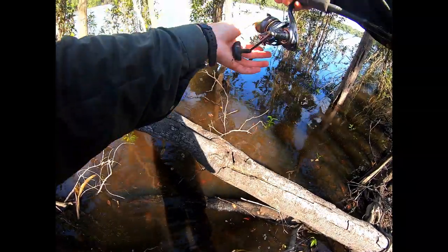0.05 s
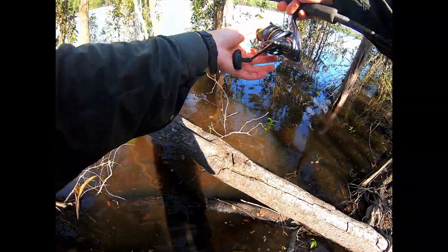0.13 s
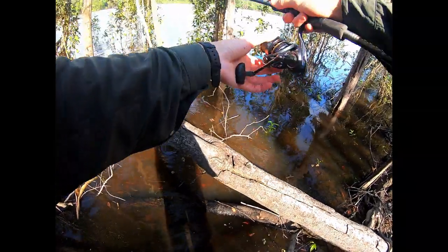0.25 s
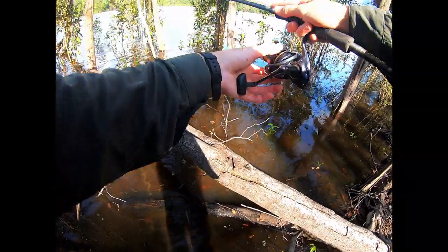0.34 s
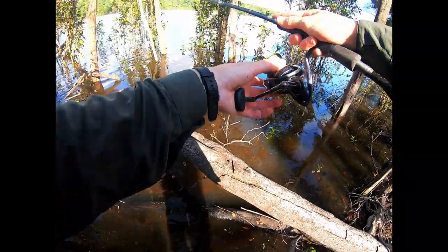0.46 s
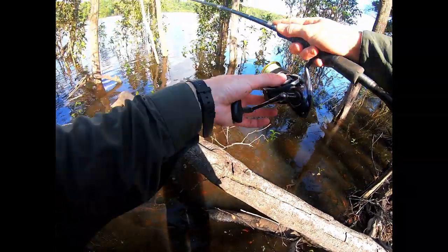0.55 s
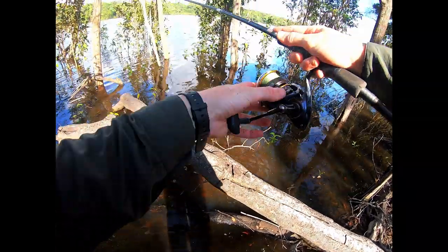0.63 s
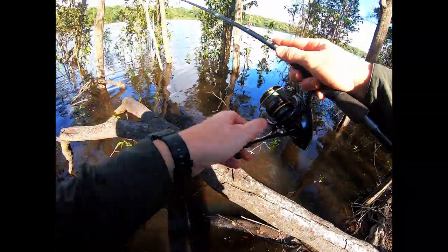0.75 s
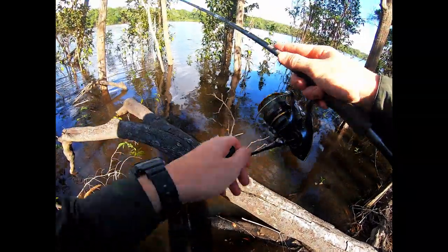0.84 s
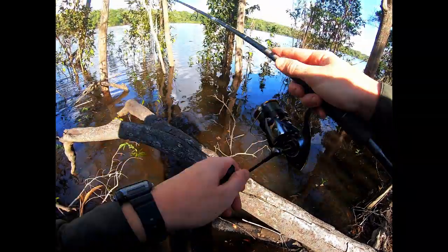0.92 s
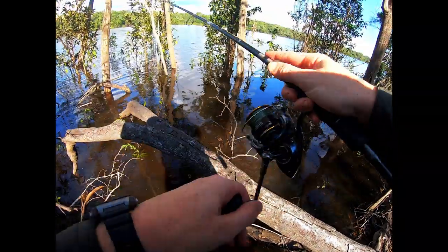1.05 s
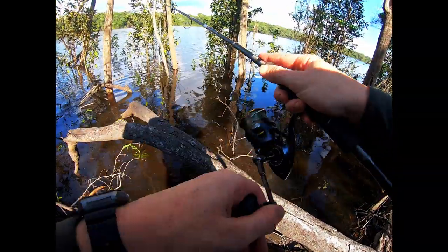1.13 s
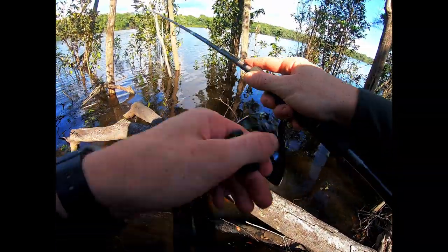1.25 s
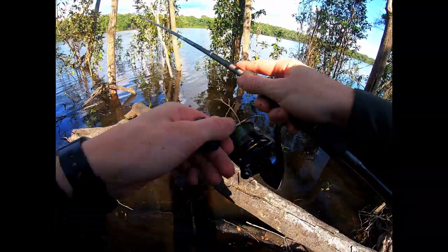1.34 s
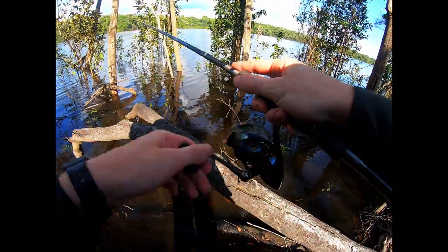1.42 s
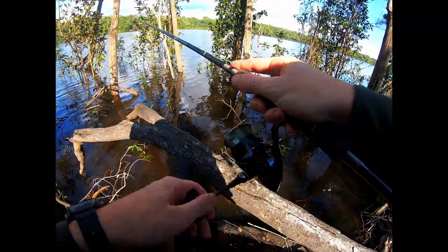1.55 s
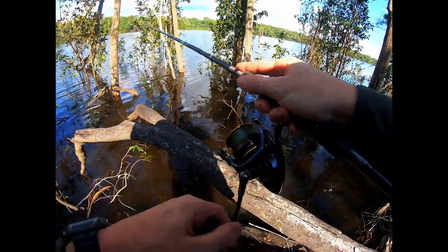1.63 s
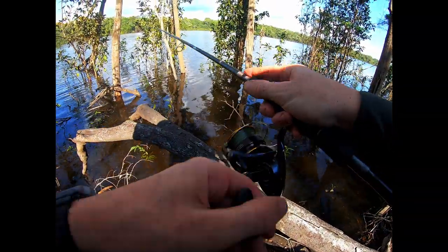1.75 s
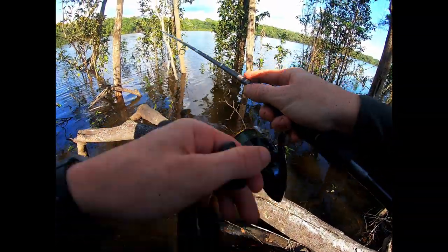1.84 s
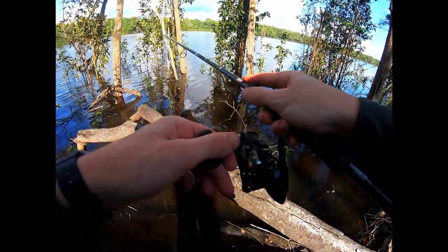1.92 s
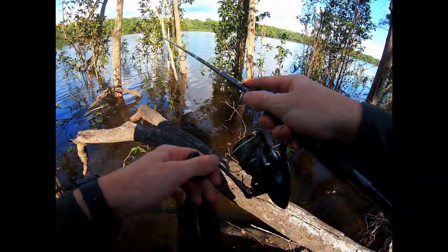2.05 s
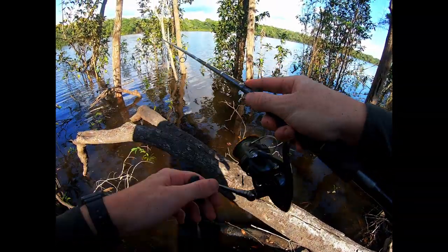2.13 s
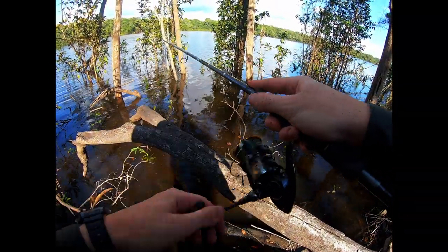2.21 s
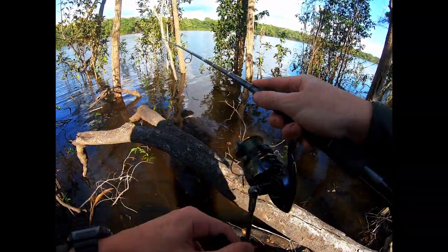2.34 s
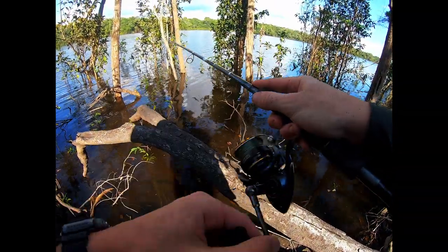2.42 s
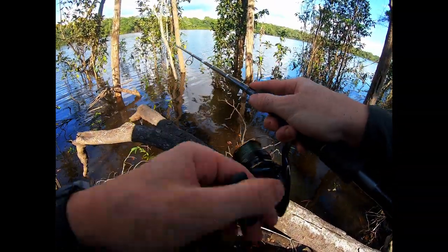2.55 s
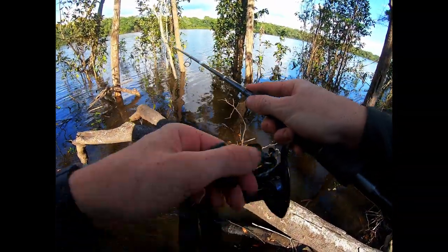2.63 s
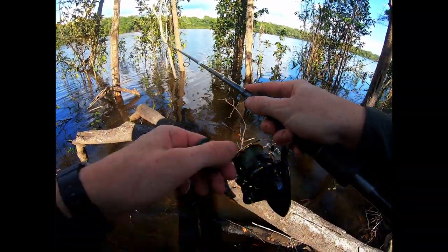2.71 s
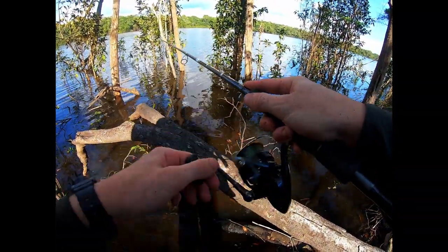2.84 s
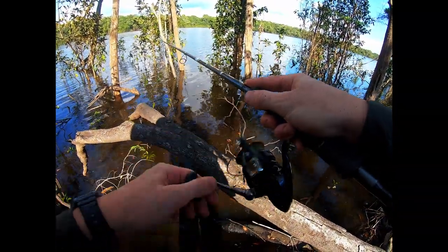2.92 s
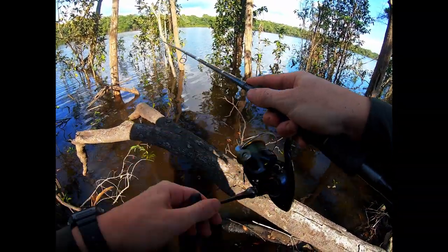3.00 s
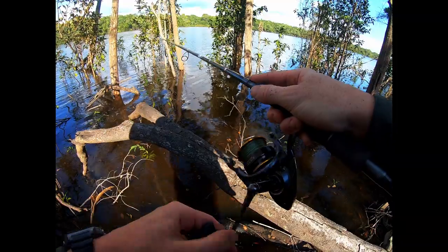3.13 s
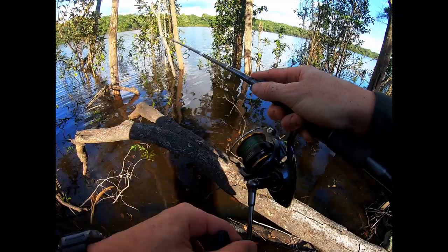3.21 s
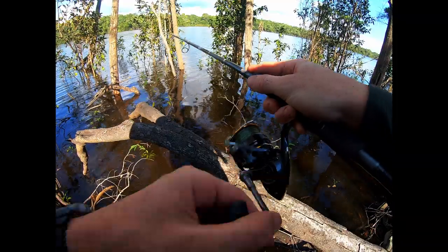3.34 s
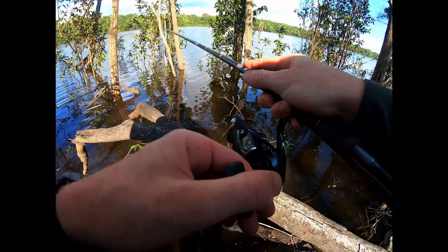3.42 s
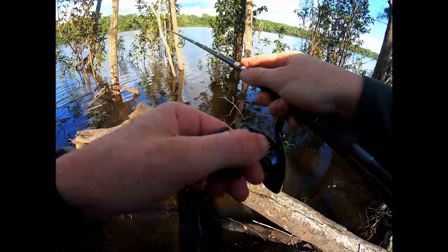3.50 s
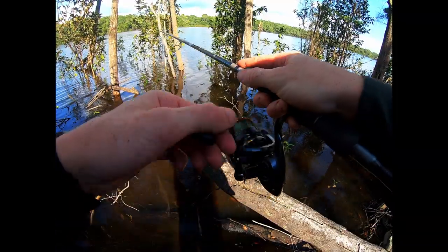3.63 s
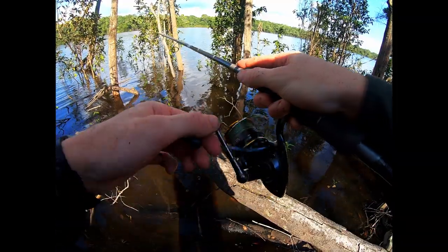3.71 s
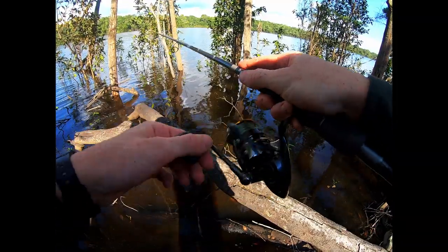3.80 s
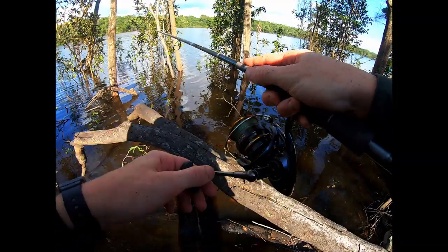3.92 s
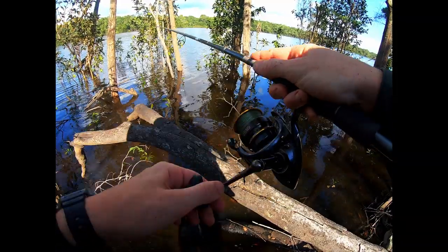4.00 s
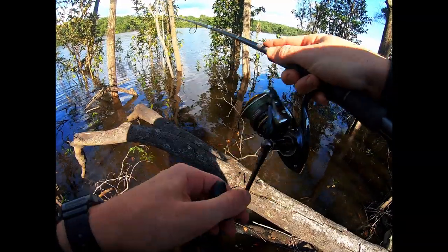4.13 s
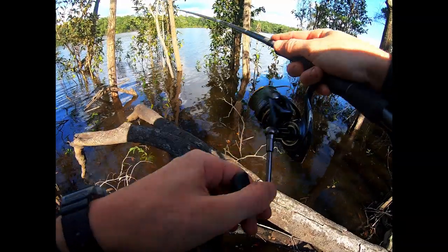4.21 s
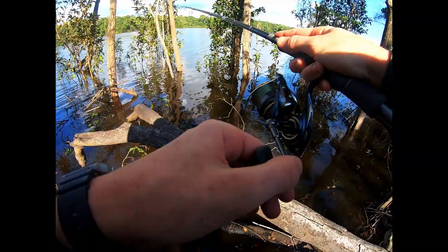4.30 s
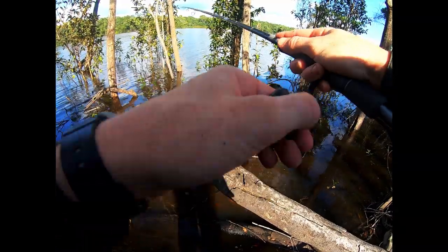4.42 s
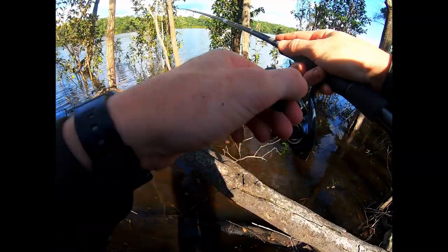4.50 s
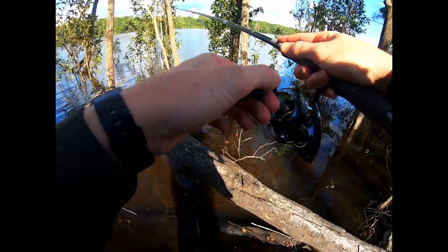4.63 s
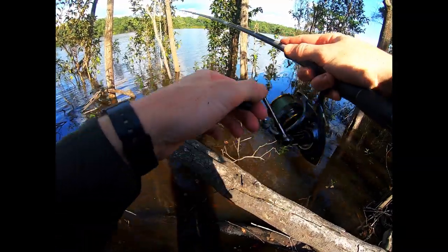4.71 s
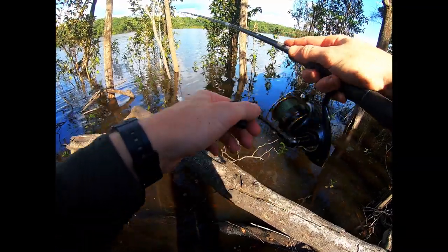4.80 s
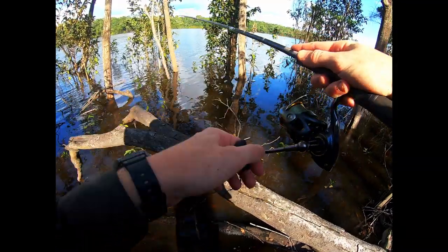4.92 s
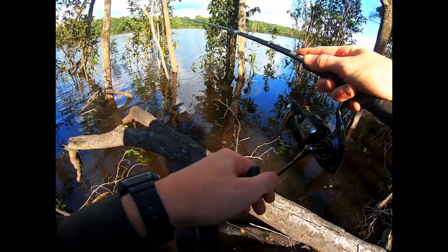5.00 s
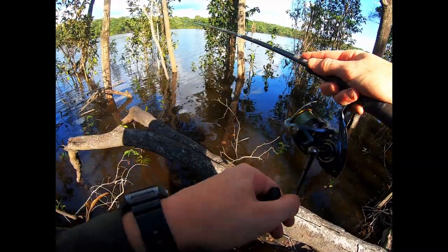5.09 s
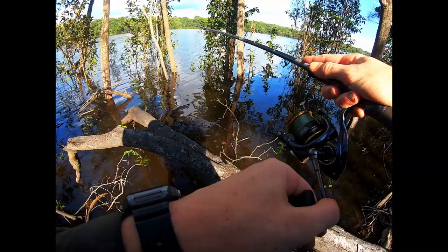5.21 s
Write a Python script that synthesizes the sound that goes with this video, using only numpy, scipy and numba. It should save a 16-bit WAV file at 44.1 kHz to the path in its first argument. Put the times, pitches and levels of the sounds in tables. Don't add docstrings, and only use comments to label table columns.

```python
import sys
import numpy as np
from scipy import signal
from scipy.fft import rfft, irfft
from scipy.io import wavfile
from scipy.ndimage import uniform_filter1d
from numba import njit

SR = 44100
rng = np.random.default_rng(int(sys.argv[2]) if len(sys.argv) > 2 else 0)


def store_pcm(level_fs):
    pcm = np.round(np.clip(level_fs, -1, 1) * 32767).astype(np.int16)
    wavfile.write(sys.argv[1], SR, np.atleast_2d(pcm).T)


def gain_from_decibels(decibels):
    exponent = np.asarray(decibels, float) / 20
    return 10 ** exponent


N = 231657
T = np.arange(N) / SR
F = np.maximum(np.fft.rfftfreq(N, 1 / SR), 1)

# f/Hz, density/dB
FOREST = [(47, -47), (80, -48), (159, -9), (413, -1), (785, 0.5), (958, -3), (1340, 0), (1670, -14),
          (3320, -23), (6500, -4.5), (7400, -6), (8200, -6), (11700, -45), (13100, -32), (16000, -53)]
# t/s, half length/s, level/dB
BREEZE = [
    (.02, 0.055, 0),
    (.36, 0.065, -9),
    (1.3, 0.072, -19),
    (2.35, 0.12, -35),
]
# t/s, half length/s, level/dB
SWELLS = [
    (.03, 0.04, -59.5),
    (.6, 0.19, -67.5),
    (1.5, 0.18, -75),
    (2.55, 0.068, -73),
    (4.16, 0.049, -66),
    (4.75, 0.58, -83),
]
# t/s, half length/s, level/dB
PUFFS = [
    (.48, 0.024, -63),
    (.7, 0.027, -59),
    (.95, 0.081, -67),
    (1.45, 0.041, -99),
    (1.81, 0.027, -74),
    (2.05, 0.092, -80),
    (2.71, 0.028, -72),
    (4.01, 0.023, -79),
]
# f/Hz, width/Hz, level/dB
INSECTS = [(6876, 210, -64.5), (7900, 110, -68), (8350, 200, -70), (8475, 490, -61)]
# t/s, half length/s, level/dB
RUSTLE = [
    (.3, 0.11, -67),
    (.75, 0.17, -53.5),
    (1.64, 0.17, -61),
    (2.08, 0.1, -58.5),
    (2.55, 0.15, -61),
    (3.17, 0.17, -70),
    (3.87, .03, -71),
    (4.35, 0.22, -69.5),
    (4.7, 0.2, -70),
    (5.15, 0.38, -69),
]
# t/s, half length/s, gain/dB
AIRY = [
    (1.15, 0.073, 3),
    (1.6, 0.32, -8),
    (2.3, 0.11, -11),
    (2.55, .1, -8),
    (3.02, 0.037, -1),
    (3.22, 0.1, 0),
    (3.5, .03, -1),
    (3.87, 0.016, -3),
    (4.35, .1, -23),
    (5.1, 0.14, -7),
]
# f/Hz, density/dB
CLOTH = [(1500, 4), (3500, -6), (5000, -.5), (6700, -1.5), (7400, -5.5), (8500, 1), (10500, -43), (11500, -45)]
CLOTH_TOP = [(8500, -10), (9600, 1), (10500, 0), (11500, -11), (13500, -8), (15800, -22)]
SWISH = [(3300, -16), (4500, -3), (6000, -5.5), (8500, 1.5), (10500, -6), (11500, -21), (15500, -25)]
# t/s, peak/dB, f/Hz, width/Hz, t60/s
TOUCHES = [(0.189, -43, 9500, 3000, .04), (.197, -40, 2900, 2500, 0.034), (.25, -54, 10400, 4000, .04),
           (0.408, -43, 7750, 4000, 0.031), (.532, -37, 8260, 4000, 0.03), (.554, -36, 7300, 4960, 0.047),
           (0.555, -37.5, 3500, 1200, 0.098), (0.558, -27.5, 4970, 2530, 0.058),
           (0.562, -37.5, 3400, 900, 0.1), (.58, -45, 5040, 7000, .15), (0.6057, -26, 2780, 3500, 0.031),
           (0.621, -38, 2310, 900, 0.11), (0.564, -34, 7400, 3500, .04), (.59, -42, 3270, 1500, 0.055),
           (.827, -45, 1500, 2500, .02), (.6298, -29.5, 3140, 1500, 0.025), (.634, -45, 3780, 1200, 0.042),
           (.648, -43, 3050, 890, 0.2), (.8396, -38, 8300, 6000, 0.033), (.819, -41, 2900, 500, .04),
           (.56, -35.5, 2400, 600, 0.096), (.585, -35.5, 1300, 1500, 0.087),
           (0.875, -35, 3700, 4000, 0.018), (2.09, -47, 6000, 7000, 0.15), (0.631, -36.5, 800, 700, 0.15),
           (0.731, -32, 520, 400, 0.18), (.745, -37, 1000, 700, 0.24), (.703, -22, 1500, 600, .07),
           (.728, -26, 4500, 900, .07), (2.178, -38, 750, 600, 0.17), (2.48, -39, 1230, 900, 0.3)]
# t/s, peak/dB, low f/Hz, high f/Hz, t60/s
KNOCKS = [(.563, -39.5, 767, 890, 0.071), (.598, -27.5, 870, 1020, 0.024), (.607, -26, 366, 821, 0.11),
          (.612, -29.5, 328, 420, 0.09), (.6195, -28.5, 634, 956, 0.036), (.639, -37, 497, 980, 0.1),
          (.630, -21, 676, 1030, 0.0083), (2.18, -43, 470, 923, 0.059), (2.189, -37, 369, 477, 0.1),
          (2.197, -37, 620, 1100, .03), (2.4713, -25, 1250, 1530, 0.02), (2.475, -24, 1430, 1670, 0.048),
          (2.492, -40, 990, 1160, 0.076)]
# t/s, peak/dB, bright share/dB, push/ms, ring length/1
BAIL = [(0.6922, -17, -14, 0.43, 0.6), (0.7016, -2.5, -0.5, 0.69, 0.59), (0.7099, -20, -1, 0.27, 0.17),
        (0.7142, -16.5, 1, .25, 0.24), (0.727, -8, -1, 0.56, 0.43), (0.7342, -18, -3, .25, 0.27),
        (0.746, -25, -16.5, .5, 1), (0.758, -37, -8, .4, 0.3), (.769, -32, -17, .4, 0.3),
        (0.7762, -30, -29, 0.37, 0.25), (0.819, -47, -25, .5, 0.5)]
# f/Hz, level/dB, t60/s
BAIL_BODY_MODES = [(1057, -16.5, 0.069), (1903, -6.5, 0.058), (2100, -3.5, 0.061), (2190, -26, 0.044),
                   (2400, -33, 0.045), (2900, 3, 0.022), (3100, -12.5, 0.019), (3560, 1, 0.021),
                   (4066, -7, 0.041), (3630, -13, 0.049), (4630, -1, 0.014)]
WIRE_MODES = [(5170, -12.5, 0.069), (6200, -23, .05), (5610, -1, 0.038), (6040, -5, 0.057),
              (7000, -11, 0.046), (8060, 1, 0.016), (8885, -7.5, 0.04), (9500, -23, 0.034),
              (11180, -25, 0.016), (12700, -26, 0.0142), (14200, -25, .015)]
# f/Hz, density/dB
CRACK = [(88, -58), (150, -15), (790, -19), (1040, -22.5), (1660, -10.5), (2140, 2), (2400, -11),
         (3620, -3), (4860, -18), (5460, -7.5), (10400, -14), (11700, -35), (16000, -35)]
# t/s, effort/dB, line resonance f/Hz, line tension/dB
CRANK = [(.95, -64, 2210, -66), (1.15, -53.5, 2000, -66), (1.33, -52, 1850, -69), (1.84, -51, 1880, -62.5),
         (2.2, -51.5, 2260, -74), (2.44, -52, 1730, -63), (2.62, -52, 1740, -64.5),
         (2.89, -53.5, 1790, -65.5), (3.26, -53, 1684, -62.5), (3.5, -55.5, 1810, -66),
         (3.62, -55.5, 1970, -67), (3.82, -55.5, 2050, -66), (4.0, -57, 2100, -72), (4.17, -56, 2230, -66),
         (4.35, -55.5, 2090, -64), (4.59, -57, 1980, -61), (4.84, -58, 1910, -60.5),
         (5.25, -54, 1880, -61.5)]
# f/Hz, width/Hz, level/dB
GEAR_MODES = [(800, 560, 4), (1080, 490, 0), (1314, 800, 7)]
HOUSING_MODES = [(2845, 220, -0.5), (3043, 840, 4), (2400, 176, 0)]
# t/s, half length/s, level/dB
GROANS = [
    (1.655, 0.028, -50.5),
    (1.74, 0.047, -56.5),
    (1.9, 0.037, -53),
    (1.58, .025, -60),
    (2.05, 0.13, -64),
    (2.13, 0.027, -61),
    (2.35, 0.04, -55.5),
    (2.44, 0.025, -56.5),
    (2.54, 0.072, -55.5),
]
# t/s, half length/s, level/dB
LEANS = [
    (1.44, 0.06, -63.5),
    (1.54, 0.027, -64),
    (2.25, 0.019, -65),
    (3.2, 0.072, -75),
]
# t/s, peak/dB, roller over body/dB
TICKS = [(1.7434, -41, -14), (2, -39, -4), (2.0228, -43, -6), (2.1067, -38.5, -6), (2.145, -35.5, -6),
         (2.174, -39, -3), (2.2046, -40.5, -13), (2.4299, -43, -13), (2.5022, -43, -14),
         (2.839, -35.5, -14), (2.8708, -43.5, -4), (2.8988, -39, -12), (2.9613, -39.5, -7),
         (2.9924, -31.5, -6.5), (3.025, -33.5, -9), (3.055, -37.5, 1.5), (3.1084, -42, -1),
         (3.1643, -35.5, -7), (3.1867, -39, -3), (3.193, -38.5, -3), (3.2184, -43, -3), (3.246, -36, -12),
         (3.254, -44, -5), (3.3059, -42, -14), (3.334, -39, -12), (3.365, -34.5, -10), (3.3967, -43, -11),
         (3.5, -33, -6.5), (3.5364, -35, -9), (3.5712, -36.5, -9), (3.7, -34, -20), (3.7888, -42.5, -9),
         (3.7978, -43, -6), (3.8666, -30, -10), (3.9, -33, -7.5), (4.0667, -48, -7), (4.4024, -39.5, -8),
         (4.777, -38, -2.5), (4.9115, -43.5, -10), (4.942, -42, -5), (5.0908, -41, -5), (5.117, -42.5, -3),
         (5.1442, -45, -5), (5.2013, -39, -16), (5.233, -41, -9)]
# t/s, peak/dB
ROLLS = [(1.552, -41), (1.572, -39), (1.5943, -48), (1.654, -44), (1.6722, -46), (2.0878, -49),
         (2.366, -45), (3.4674, -54), (4.0952, -44), (4.158, -38.5), (4.2193, -47), (4.2498, -43),
         (4.3117, -44), (4.3435, -39.5), (4.4378, -44), (4.4578, -54), (4.4703, -43), (4.503, -39),
         (4.5364, -39), (4.601, -46), (4.633, -40.5), (4.669, -42), (4.741, -48)]
# t/s, peak/dB
SPARKS = [(1.2157, -57), (1.312, -52), (1.533, -60), (1.552, -53), (1.594, -56), (1.636, -56), (1.745, -56),
          (1.795, -55), (2.0, -60), (3.009, -56), (3.18, -55), (3.202, -56), (3.219, -58), (3.236, -57),
          (3.263, -57), (3.36, -55), (1.5728, -50), (1.6527, -52), (1.6722, -51), (1.6902, -53),
          (1.7266, -58), (1.7815, -50), (2.0893, -52), (2.9443, -63), (2.9757, -57), (3.0236, -52),
          (3.0536, -60), (3.0965, -59), (3.1449, -59), (3.164, -51), (3.1873, -42), (3.312, -57),
          (3.3279, -48), (3.3493, -51), (3.499, -54), (3.8647, -54), (3.898, -57), (4.0483, -57),
          (4.1885, -51), (4.375, -58), (4.3915, -51), (4.7557, -58), (4.8869, -58), (5.0146, -59),
          (5.0356, -51), (5.073, -51), (5.1852, -50), (5.2147, -53)]
# f/Hz, level/dB, t60/s
ROTOR_MODES = [(3300, -9, .005), (2300, -14, .009), (4000, -13, .005), (1680, -14, .009)]
ROLLER_MODES = [(6900, -7, .0073), (8600, -15, .0043), (4850, -13, .006)]
# f/Hz, density/dB
SNAP = [(1000, -20), (2500, 1), (7000, 24), (9500, 21), (11000, -6), (15500, -22)]
SPARK = [(4000, -17), (7000, -2), (10000, 10), (11500, -12), (15500, -19)]
# f/Hz, left minus right/dB, right leads/rad, likeness/1
STEADY_PORTS = [(250, -1, 0, .5), (700, -1, -2, .2), (1100, -4, -1.6, .5), (1550, -2, -1.9, .65),
                (1850, 4, -2.6, .5), (2250, 1.5, -5.4, .6), (2900, -2, -6, .93), (4200, -.7, -6.2, .9),
                (4800, -2, -5.2, .6), (5500, -5, -5.6, .7), (6800, -1, -6.3, .2), (8400, -4, -7.5, .1),
                (9000, -7, -9.5, .2), (10300, 0, -11, .2), (13000, 1, -12, .2)]
HIT_PORTS = [(300, -1, .2, .9), (750, -8, 0, .45), (1100, -9, -.9, .7), (1600, 5, -1.6, .7),
             (1900, 4, -4.6, .7), (2250, 0, -5.6, .93), (2900, -2, -6.15, 1), (4000, -3, -5.9, .9),
             (4800, -6, -5.4, .8), (5500, -11, -5.7, .9), (6300, -7, -6.6, .55), (7600, -3, -7.2, .35),
             (9200, -6, -10.8, .35), (10300, -2, -10.9, .5), (12500, 7, -11, .6)]

FOREST_DB, BREEZE_REST_DB = -59, 0
WIND_REST_DB, RUMBLE_REST_DB = -78, -70.5
CHORUS_SWELL_DB = .35
RUSTLE_REST_DB, AIRY_REST_DB = -64.5, 0
AIRY_UNDER_DB, AIRY_STEEP, PATCHY_DB = -16, .18, 1.2
SPOOL_HZ, SPOOL_DB, SPOOL_STOP_S = 12800, -86, .5
GRIP_DB, MODE_SCATTER = .5, .01
SWISH_S, SWISH_HALF_S, SWISH_DB = .891, .028, -44.5
GEAR_WANDER_DB, LINE_WIDTH_HZ = 1.5, 330
HOUSING_UNDER_DB, HUM_UNDER_DB = -3.5, -17.5
GROAN_HZ, GROAN_SAG_HZ, GROAN_SAG_S, GROAN_SAG_HALF_S = 1065, 109, 2.15, .16
SNAP_DB, ROLLER_DB, TICK_DB, SPARK_DB = -5, 1, .5, 2
ROLLER_LEAD_S, TICK_PITCH_SCATTER, FOOT_SCATTER_DB = .0007, .025, 2
HIT_CUT_HZ, CHEST_ECHO_S, ECHO_DB = 110, .001283, -3.5
DUCK_S, DUCK_DB, DUCK_HOLD_S, DUCK_RECOVER_S = .61, -.5, .62, .17


def unit(x):
    return x / np.sqrt(np.mean(x ** 2))


def curves(rows):
    s, *columns = np.transpose(rows)
    return [np.interp(T, s, c) for c in columns]


def colour(x, points):
    hz, db = np.transpose(points)
    gain_db = np.interp(np.log(F), np.log(hz), db, left=-90, right=-90)
    return irfft(rfft(x) * gain_from_decibels(gain_db), N)


@njit
def svf(x, hz, width):
    y, b, l = np.empty(len(x)), 0., 0.
    for i in range(len(x)):
        g, k = np.tan(np.pi * hz[i] / SR), width / hz[i]
        v = (b + g * (x[i] - l)) / (1 + g * (g + k))
        b, l, y[i] = 2 * v - b, l + 2 * g * v, k * v
    return y


def band(x, hz, width):
    hz = np.full(N, 1.) * hz
    return unit(svf(svf(x, hz, 1.36 * width), hz, 1.36 * width))


def walk(rate):
    k = int(SR / rate)
    held = np.repeat(rng.standard_normal(N // k + 1), k)
    return 3.82 * uniform_filter1d(uniform_filter1d(held, k), k)[:N]


def grains(spread_db):
    size = np.minimum(rng.exponential(size=N), 5.5)
    return rng.standard_normal(N) * gain_from_decibels(spread_db * size)


def swells(rows, rest_db=-120):
    return gain_from_decibels(rest_db) + sum(gain_from_decibels(db) * np.exp(-.5 * ((T - s) / half) ** 2) for s, half, db in rows)


def ring(modes, chance, push_ms, length=.98):
    t = np.arange(int(.35 * SR)) / SR
    y = np.zeros(len(t))
    for (hz, db, t60), c in zip(modes, chance):
        phase = 2 * np.pi * hz * (1 + MODE_SCATTER * c[1]) * t + .5 * c[2]
        y += gain_from_decibels(db + 1.2 * c[0]) * np.sin(phase) * 1000. ** (-t / t60 / length)
    y = y * (1 - np.exp(-t * 1000 / max(push_ms, .05))) ** 2
    return y / np.abs(y).max()


def add(out, s, y):
    i = int(s * SR)
    out[i:i + len(y)] += y[:N - i]


def ports(near, other, table):
    hz, db, lead, like = np.transpose(table)
    db, lead, like = (np.interp(np.log(F), np.log(hz), c) for c in (db, lead, like))
    left = rfft(near)
    right = like * left + np.sqrt(1 - like ** 2) * rfft(other)
    return np.array([irfft(left * gain_from_decibels(db / 2), N), irfft(right * gain_from_decibels(-db / 2) * np.exp(1j * lead), N)])


def still_air():
    air = unit(colour(rng.standard_normal(N), FOREST))
    return gain_from_decibels(FOREST_DB) * swells(BREEZE, BREEZE_REST_DB) * air


def rumble_and_wind():
    low = band(rng.standard_normal(N), 171.2, 43.)
    high = band(rng.standard_normal(N), 221.4, 55.)
    rumble = gain_from_decibels(walk(8)) * unit(low + gain_from_decibels(.5) * high)
    wind = gain_from_decibels(1 + .8 * walk(6.9)) * band(rng.standard_normal(N), 38.5, 25.)
    return gain_from_decibels(6) * swells(SWELLS, RUMBLE_REST_DB) * rumble + swells(PUFFS, WIND_REST_DB) * wind


def insects():
    out = np.zeros(N)
    for hz, width, db in INSECTS:
        buzz = gain_from_decibels(db + CHORUS_SWELL_DB * walk(1.14) + .68 * walk(130))
        out += buzz * band(rng.standard_normal(N), hz, width)
    return out


def rustle():
    fibres = grains(4.5) * gain_from_decibels(.5 * walk(33))
    cloth = unit(colour(fibres, CLOTH))
    patches_db = PATCHY_DB * (.38 * walk(30) + walk(190))
    airy = gain_from_decibels(AIRY_UNDER_DB + patches_db) * unit(colour(fibres, CLOTH_TOP))
    stir = swells(RUSTLE, RUSTLE_REST_DB)
    steep = np.minimum(stir / gain_from_decibels(-57), 1.3) ** AIRY_STEEP
    return stir * (gain_from_decibels(1) * cloth + steep * swells(AIRY, AIRY_REST_DB) * airy)


def spool():
    whine = band(rng.standard_normal(N), SPOOL_HZ, 280.) * gain_from_decibels(1.2 * walk(25))
    return gain_from_decibels(SPOOL_DB) * whine * np.clip((SPOOL_STOP_S - T) / .05, 0, 1)


def hand():
    out, t = np.zeros(N), np.arange(int(.2 * SR)) / SR
    scrape = unit(grains(1.9))
    chance = rng.standard_normal((len(KNOCKS), 3, 3))
    grip = gain_from_decibels(GRIP_DB * walk(300))
    for s, db, hz, width, t60 in TOUCHES:
        centre = np.full(len(t), 1. * hz)
        rough = svf(scrape[int(s * SR):][:len(t)], centre, 1. * width)
        rough = unit(svf(rough, centre, 1.47 * width))
        add(out, s, gain_from_decibels(db - 6) * rough * 1000. ** (-t / t60) * (1 - np.exp(-t / .00018)))
    for (s, db, low_hz, high_hz, t60), c in zip(KNOCKS, chance):
        modes = [(low_hz, -.5, t60), (high_hz, 0, t60 * .9), (high_hz * 1.137, -5, t60 * .51)]
        knock = ring(modes, c, min(.86, 40 * t60))
        add(out, s, gain_from_decibels(db - 4) * knock * grip[int(s * SR):][:int(.35 * SR)])
    return out


def bail():
    out, rattle = np.zeros(N), np.zeros(N)
    chance = rng.standard_normal((len(BAIL), 2, 11, 3))
    t = np.arange(int(.1 * SR)) / SR
    for (s, db, bright_db, push_ms, length), c in zip(BAIL, chance):
        add(out, s, gain_from_decibels(db) * ring(BAIL_BODY_MODES, c[0], push_ms, length))
        add(out, s, gain_from_decibels(db + bright_db) * ring(WIRE_MODES, c[1], push_ms * .58, length))
        rise = 1 - np.exp(-t * 1000 / max(push_ms, .05))
        fall = np.exp(-t / .0022) + gain_from_decibels(-12) * np.exp(-t / .03 / length)
        add(rattle, s, gain_from_decibels(db + .67 * bright_db - 6) * rise * fall)
    return out + rattle * unit(colour(grains(1.1), CRACK))


def swish():
    cloth = unit(colour(grains(2), SWISH))
    half = np.where(T < SWISH_S, SWISH_HALF_S, 1.3 * SWISH_HALF_S)
    return gain_from_decibels(SWISH_DB) * cloth * np.exp(-.5 * ((T - SWISH_S) / half) ** 2)


def crank():
    effort_db, line_hz, line_db = curves(CRANK)
    start = np.clip((T - CRANK[0][0]) / .24, 0, 1)
    teeth = grains(4.17)
    gear = unit(sum(gain_from_decibels(db + GEAR_WANDER_DB * walk(18)) * band(teeth, hz, w) for hz, w, db in GEAR_MODES))
    housing = unit(sum(gain_from_decibels(db + .9 * walk(25.25)) * band(teeth, hz, w) for hz, w, db in HOUSING_MODES))
    sag = np.exp(-.5 * ((T - GROAN_SAG_S) / GROAN_SAG_HALF_S) ** 2)
    groan_hz = (GROAN_HZ - GROAN_SAG_HZ * sag) * (1 + .024 * walk(12))
    groan = swells(GROANS) * band(teeth + 3 * grains(1), groan_hz, 150.) * gain_from_decibels(.5 * walk(39.97))
    line = band(grains(2.6), line_hz * (1 + .007 * walk(60)), LINE_WIDTH_HZ) * gain_from_decibels(.8 * walk(90))
    hum = band(teeth, 469 * (1 + .012 * walk(2)), 120.) * gain_from_decibels(2 * walk(2.98))
    hum_gain = gain_from_decibels(effort_db + HUM_UNDER_DB) + swells(LEANS)
    return start * (gain_from_decibels(effort_db - 1) * gear + groan + gain_from_decibels(effort_db + HOUSING_UNDER_DB) * housing
                    + gain_from_decibels(line_db + 9.5) * line + hum_gain * hum)


def ticks():
    out, snap, spark = np.zeros(N), np.zeros(N), np.zeros(N)
    rows = [(s, db, db + tilt_db + ROLLER_DB) for s, db, tilt_db in TICKS]
    rows += [(s + .00052, db - 22, db - .5) for s, db in ROLLS]
    t = np.arange(300) / SR
    fade = np.exp(-t / .0013)
    lead = ROLLER_LEAD_S / 2
    for (s, body_db, roller_db), c in zip(rows, rng.standard_normal((len(rows), 2, 5, 3))):
        body_hz, roller_hz = np.array([3050, 5650]) * (1 + TICK_PITCH_SCATTER * np.clip(c[:, 0, 1], -1.5, 1.5))
        body_modes = [(body_hz, 0, .0065)] + ROTOR_MODES
        roller_modes = [(roller_hz, -1.5, .006), (1.08 * roller_hz, -6, .0055)] + ROLLER_MODES
        scatter = gain_from_decibels(FOOT_SCATTER_DB) * c
        add(out, s + lead, gain_from_decibels(body_db + TICK_DB) * ring(body_modes, scatter[0], .57))
        add(out, s - lead, gain_from_decibels(roller_db + TICK_DB) * ring(roller_modes, scatter[1], .3))
        add(snap, s - lead, gain_from_decibels(roller_db + SNAP_DB) * fade)
    for s, db in SPARKS:
        add(spark, s + .0007, gain_from_decibels(db + SPARK_DB) * fade)
    noise = rng.standard_normal(N)
    return out + snap * unit(colour(noise, SNAP)) + spark * unit(colour(noise, SPARK))


def scene():
    high_pass = signal.butter(3, HIT_CUT_HZ, "high", fs=SR, output="sos")
    hits = signal.sosfilt(high_pass, hand() + bail() + ticks())
    taps = rng.standard_normal(200) * np.exp(-np.arange(200) / SR / CHEST_ECHO_S)
    echo = signal.fftconvolve(hits, taps / np.linalg.norm(taps))[:N]
    recovery = np.exp(-np.maximum(T - DUCK_S - DUCK_HOLD_S, 0) / DUCK_RECOVER_S)
    duck = gain_from_decibels(DUCK_DB * (T > DUCK_S) * recovery)
    near, other = (still_air() + insects() + rustle() + spool() + swish() + crank() for _ in range(2))
    steady = ports(near, other, STEADY_PORTS) + np.array([rumble_and_wind(), rumble_and_wind()])
    return ports(hits, gain_from_decibels(ECHO_DB) * echo, HIT_PORTS) + duck * steady


def top_cut(x):
    return signal.sosfilt(signal.butter(12, 15830, fs=SR, output="sos"), x)


def record(dry):
    held = dry / (1 + (dry / .93) ** 6) ** (1 / 6)
    low_pass = signal.ellip(8, .2, 60, 15800, fs=SR, output="sos")
    mix = signal.sosfilt(low_pass, held)
    return top_cut(mix)


dry = scene()
out = record(dry)
store_pcm(out)
```